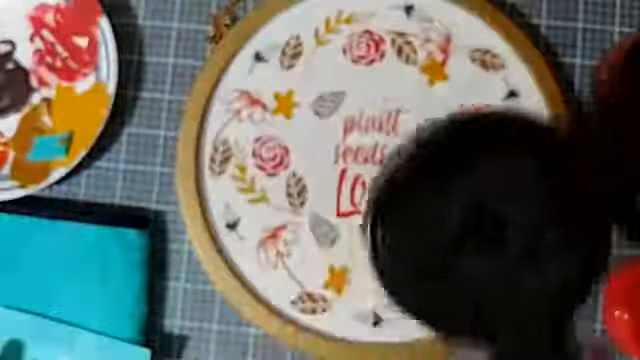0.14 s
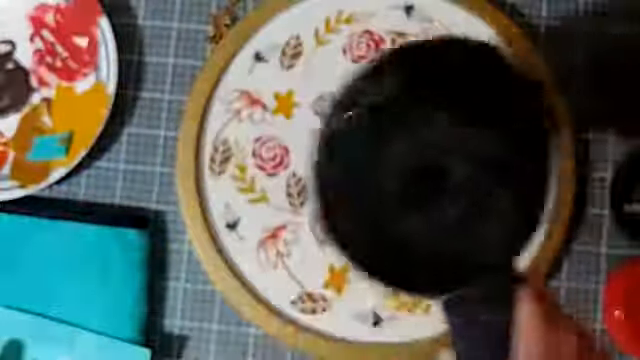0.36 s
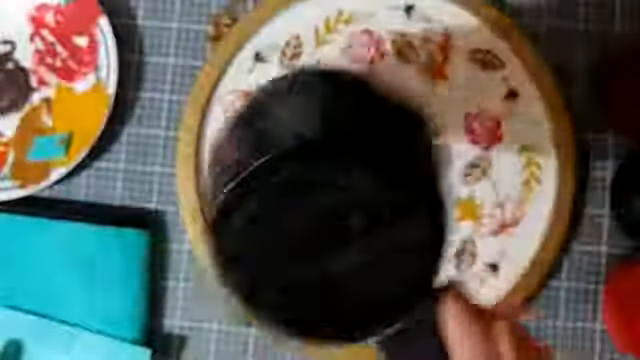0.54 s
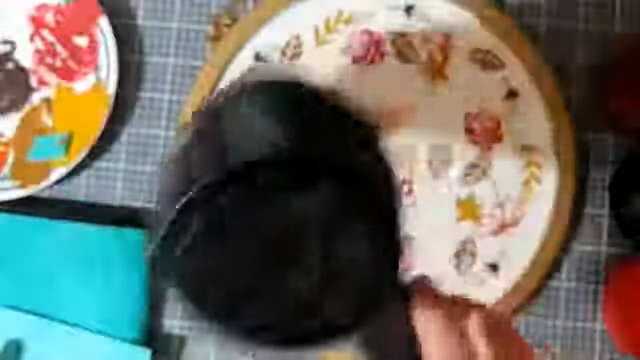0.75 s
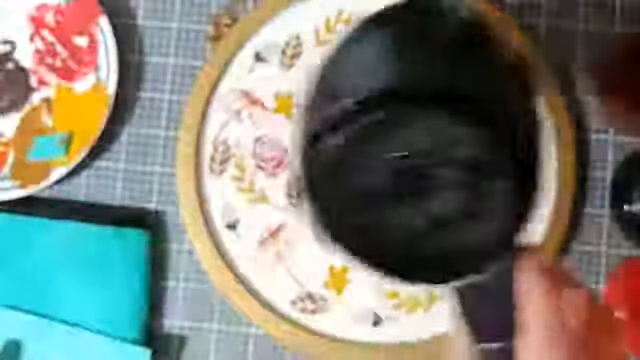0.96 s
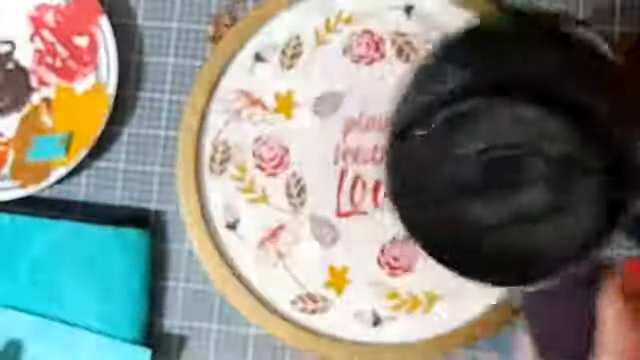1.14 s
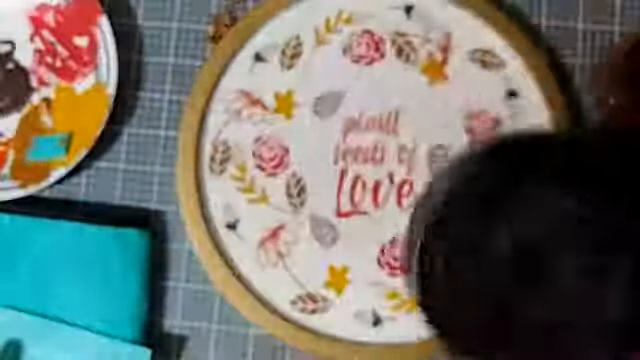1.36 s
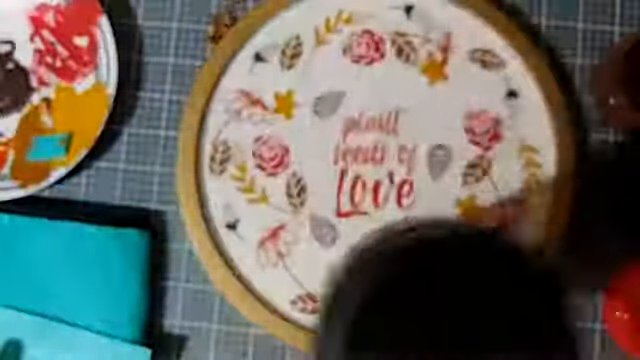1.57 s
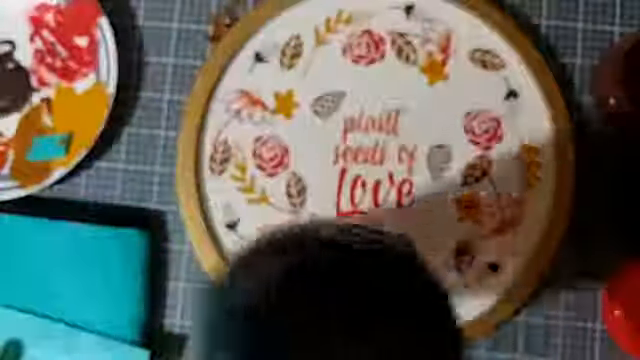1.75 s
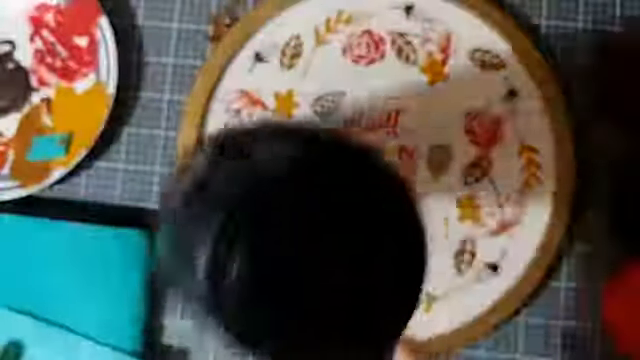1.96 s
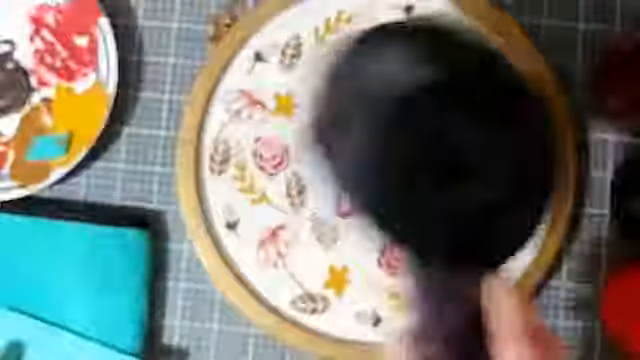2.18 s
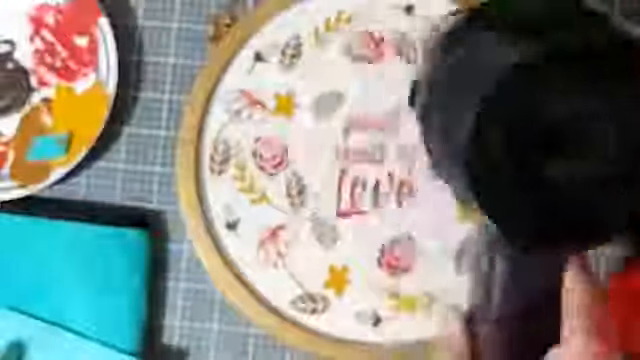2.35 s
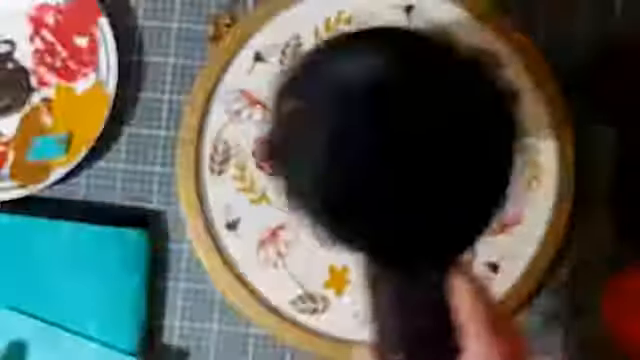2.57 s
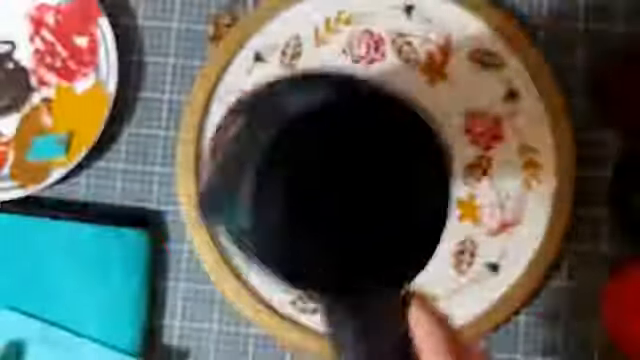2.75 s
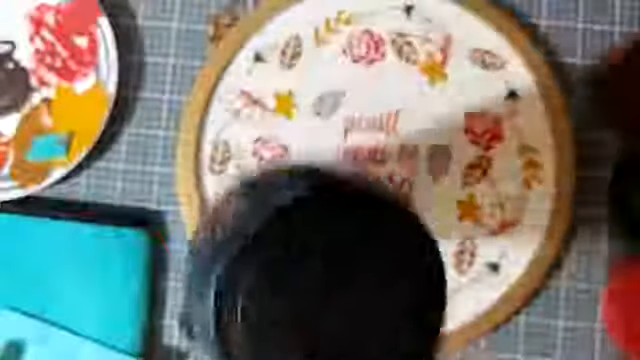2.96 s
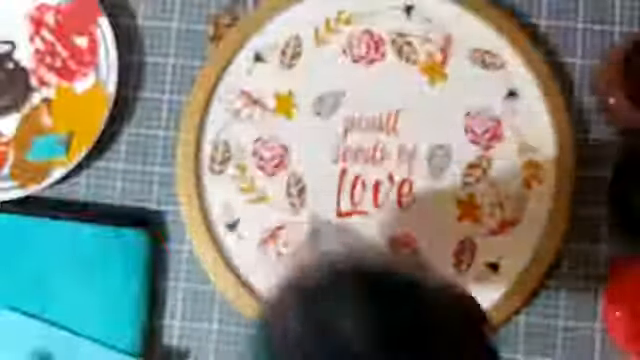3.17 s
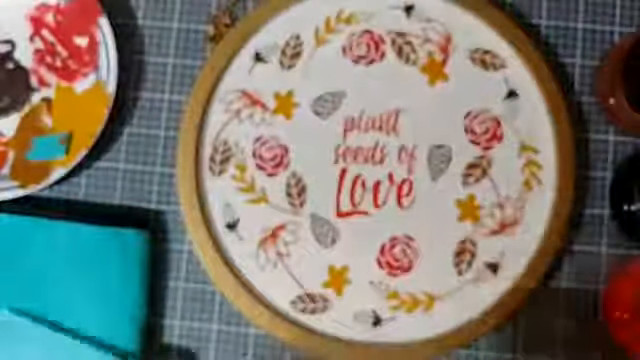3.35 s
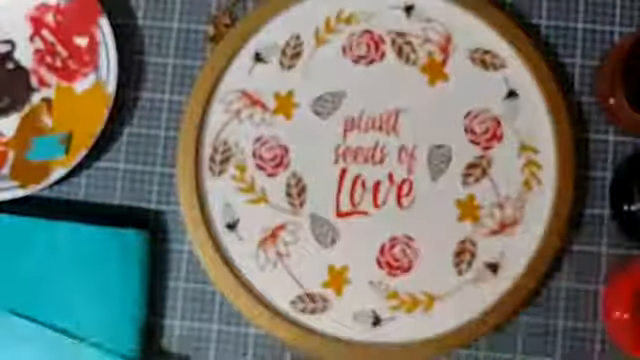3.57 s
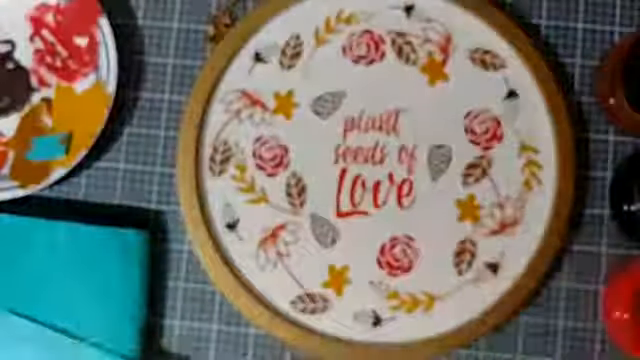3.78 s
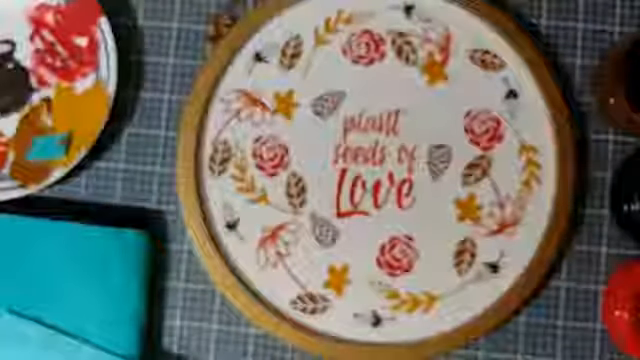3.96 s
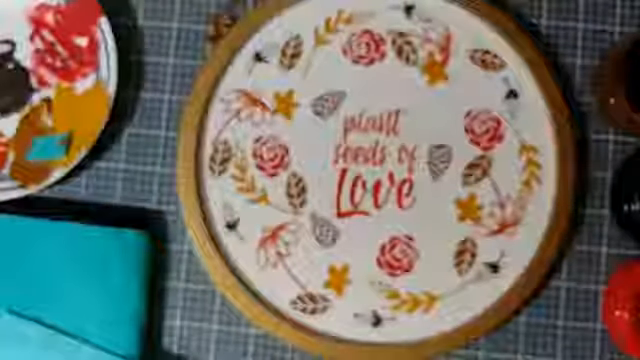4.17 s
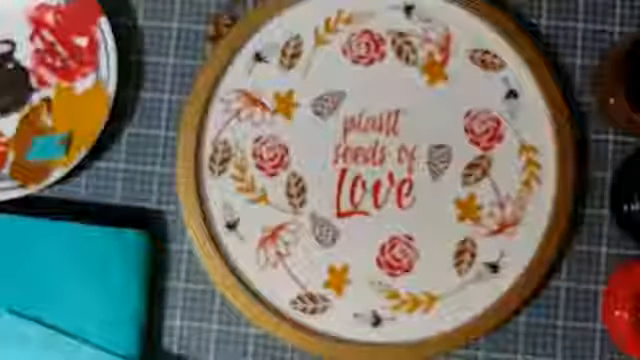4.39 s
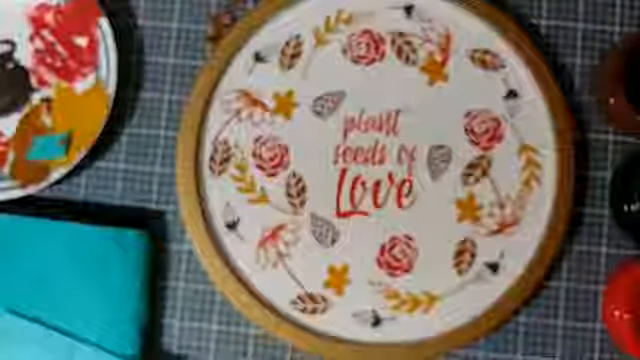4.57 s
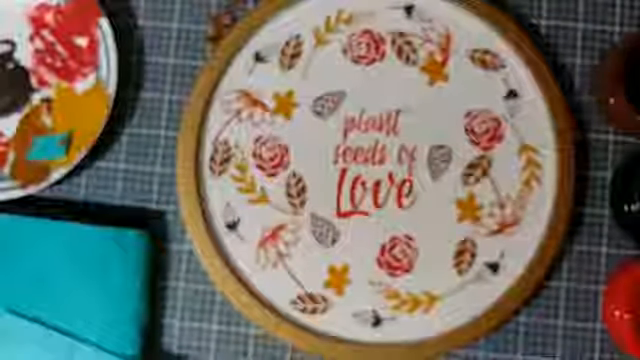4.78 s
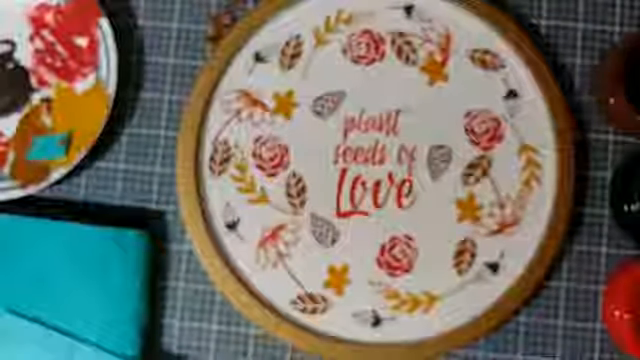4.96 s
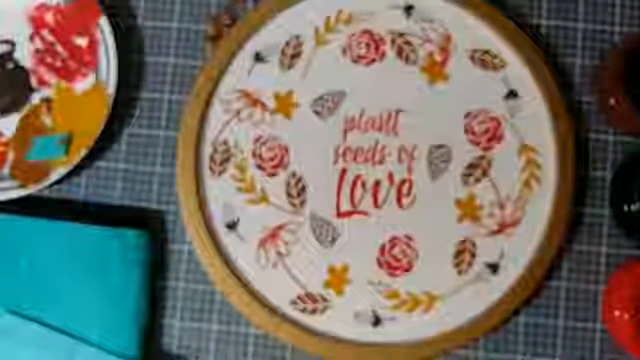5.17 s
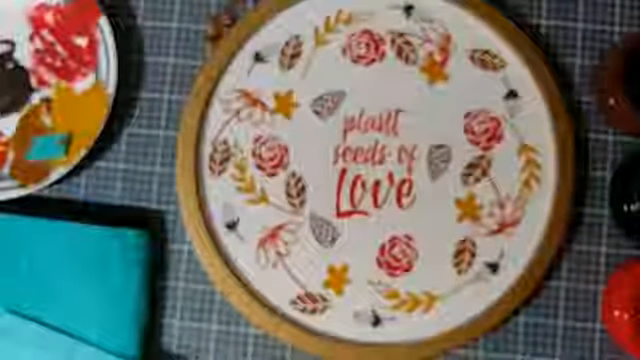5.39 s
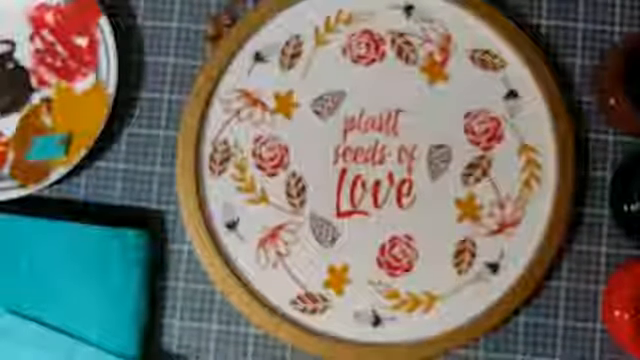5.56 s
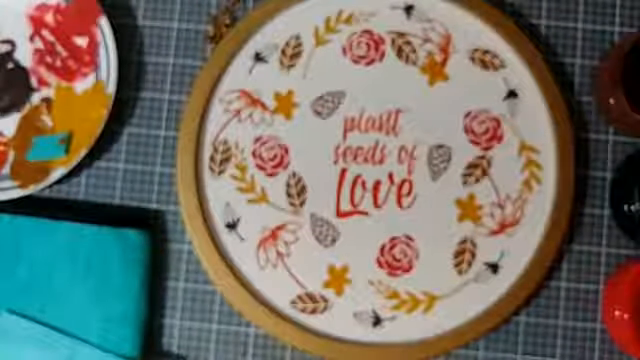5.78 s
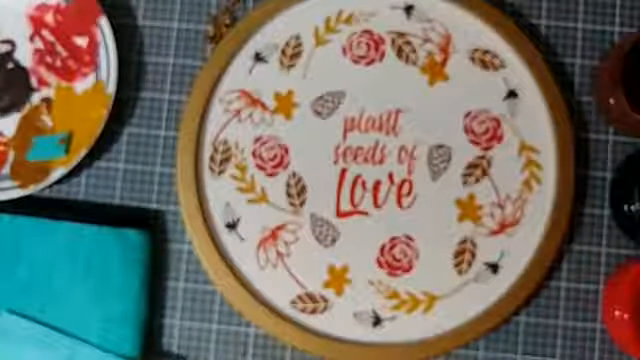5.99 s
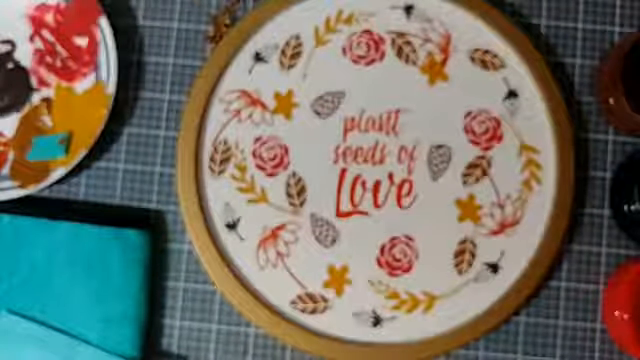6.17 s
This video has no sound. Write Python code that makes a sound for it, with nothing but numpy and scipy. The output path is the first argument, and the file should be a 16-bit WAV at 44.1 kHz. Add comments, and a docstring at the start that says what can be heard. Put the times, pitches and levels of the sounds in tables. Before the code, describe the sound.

Rushing dryer air and a faint motor whine sweep about, recede, cut off with a falling pitch, then hard plastic knocks boomily on a table.

```python
"""A hair dryer is waved over a wooden tray under a phone: a harmonic blade whine over turbulent air noise,
filtered by resonances that swell with the aim. It is carried away, switched off and runs down, then is
set on the table: noisy cracks, decaying casing and wood modes, and a low boom as it rocks to rest.
Soft bumps and short bursts of noise, one a thin hiss near 13 kHz, are scattered about. The table hums
softly all the while, as randomly driven resonances, in the filtered noise of a small quiet room."""
import sys
import numpy as np
from scipy import signal
from scipy.fft import rfft, irfft
from scipy.io import wavfile
from scipy.ndimage import uniform_filter1d

SR = 44100
rng = np.random.default_rng(int(sys.argv[2]) if len(sys.argv) > 2 else 0)


def inscribe(sig):
    """Save sig as 16-bit PCM at rate SR to the path in sys.argv[1].

    A 1-D sig is mono; a 2-D sig holds one channel per row.
    Samples are clipped to [-1, 1] before scaling.
    """
    pcm = np.round(np.clip(np.atleast_2d(sig).T, -1, 1) * 32767)
    wavfile.write(sys.argv[1], SR, pcm.astype(np.int16))


def level_to_linear(level):
    """Convert decibel levels to linear amplitude factors, elementwise."""
    exponent = np.asarray(level, float) / 20
    return 10 ** exponent


N = 274743
TIME = np.arange(N) / SR
SWITCH_OFF_S = 4.235
ECHO_T60_S = 0.19


def level(x, db):
    """Scale a signal to an rms level."""
    return x * level_to_linear(db) / np.sqrt(np.mean(x ** 2))


def curves(breakpoints):
    """Linear interpolation of every column against the first, the time in seconds."""
    s, *columns = np.transpose(breakpoints)
    return [np.interp(TIME, s, column) for column in columns]


def colour(x, points):
    """Minimum-phase filter through (Hz, dB) points: folding the cepstrum makes the response causal."""
    hz, db = np.transpose(points)
    grid = np.fft.rfftfreq(4096, 1 / SR) + 1  # 1 Hz up, so that the logarithm exists
    log_gain = np.interp(np.log(grid), np.log(hz), db) * np.log(10) / 20
    cepstrum = irfft(log_gain)
    cepstrum[1:2048] *= 2
    cepstrum[2049:] = 0
    response = irfft(np.exp(rfft(cepstrum)))
    return signal.fftconvolve(x, response)[:len(x)]


def band(x, hz, width):
    """Second-order resonance with unit gain at its centre."""
    return signal.lfilter(*signal.iirpeak(hz, hz / width, fs=SR), x)


def walk(rate):
    """Band-limited random modulation: levels held 1 / rate s, smoothed twice; spread near 1."""
    hold = int(SR / rate)
    steps = np.repeat(rng.standard_normal(N // hold + 1), hold)
    return 1.3 * uniform_filter1d(uniform_filter1d(steps, hold), hold)[:N]


def swell(s, length):
    """Gaussian rise and fall of height 1 around a moment, down to exp(-2) half a length away."""
    return np.exp(-8 * ((TIME - s) / length) ** 2)


def ring(modes, t, tilt_db=0):
    """Modal sum of decaying sines; the tilt per octave about 600 Hz says where the blow lands."""
    out = 0
    for hz, db, t60 in modes:
        mode_db = db + tilt_db * np.log2(hz / 600) - 60 * t / t60
        out = out + level_to_linear(mode_db) * np.sin(2 * np.pi * hz * t)
    return out


def add(out, s, x):
    """Superpose a sound on the mix from a given moment."""
    i = int(s * SR)
    out[i:i + len(x)] += x[:N - i]


def room():
    """Quiet air of the room: stationary noise of fixed spectrum with a slight slow waver."""
    # spectrum of the room air: frequency_hz, density_db (relative)
    spectrum = [(40, -14), (150, -9), (300, -22), (700, -14), (1500, -20), (2400, -27), (3500, -27.5),
                (4800, -24.5), (9000, -33.5), (13000, -29)]
    return level(colour(rng.standard_normal(N), spectrum), -60.5) * level_to_linear(0.5 * walk(3.0))


def table(force):
    """Modal resonance: a force drives the low modes of the table top."""
    # modes of the top: frequency_hz, width_hz, level_db (relative)
    modes = [(57, 7.5, -21), (87.2, 20.3, -4), (123.1, 5.6, 5.5), (175, 17.7, -8.5), (237.6, 9.1, -15),
             (482, 74, -17)]
    return sum(level_to_linear(db) * band(force, hz, width) for hz, width, db in modes)


def bumps():
    """Soft bumps on the table: low tones in Gaussian envelopes."""
    # bumps: centre_s, peak_db, length_s (from the peak to exp(-2)), pitch_hz
    bump_list = [(0.493, -41, 0.0086, 90), (1.138, -47.5, 0.12, 85.5), (2.148, -35, .03, 117),
                 (3.7, -41, 0.011, 91), (3.95, -50.5, 0.1, 185), (4.093, -41, 0.015, 116),
                 (5.418, -35, 0.011, 124), (5.507, -42, 0.034, 121), (5.849, -44, 0.023, 88),
                 (5.896, -44, 0.033, 129), (5.929, -31, 0.0041, 128)]
    out = np.zeros(N)
    for s, db, length, hz in bump_list:
        t = np.arange(int(4 * length * SR)) / SR - 2 * length
        envelope = level_to_linear(db) * np.exp(-2 * (t / length) ** 2)
        add(out, s - 2 * length, envelope * np.cos(2 * np.pi * hz * t))
    return out


def hum():
    """Forced vibration: a steady random shake excites the table modes, wavering and lulling once."""
    hum_db, waver_db = -53, 2.0
    lull_s, lull_length_s, lull_db = 5.77, 0.11, -5.5
    shake_db = hum_db + waver_db * walk(5.01) + lull_db * swell(lull_s, lull_length_s)
    shaken = level(table(rng.standard_normal(N)), 0)
    return shaken * level_to_linear(shake_db + 1.87 * walk(20))


def noise_bursts():
    """Short bursts of resonance-filtered noise, each with its own exponential decay."""
    # bursts, one a thin hiss near 13 kHz: start_s, level_db (before the decay), centre_hz, width_hz, t60_s
    burst_list = [(4.39, -51, 5800, 5000, 0.072), (4.678, -53, 6470, 2520, 0.18),
                  (4.768, -57, 6900, 9000, .05), (4.962, -61, 6500, 6000, 0.052),
                  (5.0, -60.5, 2470, 1490, .08), (5.706, -58.5, 6300, 3000, 0.26),
                  (5.724, -46, 13300, 2500, 0.28), (6.202, -58, 9000, 9000, 0.037)]
    out, t = np.zeros(N), np.arange(SR // 3) / SR
    noises = rng.standard_normal((len(burst_list), len(t)))
    for (s, db, hz, width, t60), noise in zip(burst_list, noises):
        burst = level(band(band(noise, hz, width), hz, width), db)
        add(out, s, burst * level_to_linear(-60 * t / t60))
    return out


def booms():
    """Low boom of the table top near 127 Hz after the blows: a single tone swells, holds and is damped."""
    # booms: start_s, level_db, hold_s, t60_s
    boom_list = [(5.16, -12.5, 0.0064, 0.14), (5.2616, -14, 0.0065, 0.1), (5.2993, -16, 0.061, 0.047),
                 (5.424, -40, .004, .12)]
    boom_hz, swell_s = 127, 0.012
    out, t = np.zeros(N), np.arange(SR // 2) / SR
    for s, db, hold, t60 in boom_list:
        rise = np.clip(0.25 + 0.7 * t / swell_s, 0, 1) * np.clip(t / 0.0076, 0, 1)
        fall = level_to_linear(-60 * np.maximum(t - swell_s - hold, 0) / t60)
        add(out, s, level_to_linear(db) * rise * fall * np.sin(2 * np.pi * boom_hz * t - 0.6))
    return out


def blows():
    """Impact excitation as dryer meets table: a noisy crack and echo, casing modes and wood modes."""
    # blows: start_s, crack_db, casing_db (over the crack), wood_db, wood_tilt_db (per octave)
    blow_list = [(5.16, -16.5, 3.5, -13.5, 1.5), (5.258, -14, -18.5, -23.5, -2.5),
                 (5.2983, -21, -7.5, -15.5, 0.5), (5.3205, -24, -26, -24.5, -3),
                 (5.428, -59, -3, -27.5, 11)]
    # modes of the dryer casing: frequency_hz, level_db (relative), t60_s
    casing = [(2290, -6, 0.034), (3320, -18, 0.047), (3760, -1, 0.0138), (4270, 1.5, 0.01)]
    # modes of the wood: frequency_hz, level_db (relative), t60_s
    wood_modes = [(29, -10, 0.11), (98, -19, 0.1), (206, 3, 0.11), (255, -1.5, 0.11), (307, 3, 0.045),
                  (385, -0.5, 0.072), (411, -3, 0.13), (504, 2, 0.076), (599, -4.5, 0.068),
                  (716, -10, 0.051), (866, -14, 0.1), (1010, -4, 0.025), (1470, -33, 0.046)]
    # spectrum of the crack: frequency_hz, density_db (relative)
    shell = [(400, -2), (1400, -6), (2200, 3), (3800, 2), (6000, 10.5), (9000, -3), (14000, -7)]
    echo_db = -12.5
    out, t = np.zeros(N), np.arange(SR // 2) / SR
    noises = rng.standard_normal((len(blow_list), len(t)))
    for (s, crack_db, casing_db, wood_db, tilt_db), noise in zip(blow_list, noises):
        # the echoes build up over some milliseconds after the crack
        echo = level_to_linear(echo_db - 60 * t / ECHO_T60_S) * np.clip(t / 0.0067, 0, 1)
        crack = colour(noise * (np.exp(-(t / 0.002) ** 2) + echo), shell)
        crack = crack + level_to_linear(casing_db) * ring(casing, t)
        # a decaying noise beside the wood modes
        scatter_points = [(150, -7.5 - 2 * tilt_db), (400, -tilt_db / 2),
                          (1200, -15.0 + tilt_db), (3000, -45.0 + tilt_db)]
        scatter = colour(noise[::-1], scatter_points) * level_to_linear(8.0 - 60 * t / 0.17)
        wood = (ring(wood_modes, t, tilt_db) / 2 + scatter) * np.clip(t / 0.0012, 0, 1)
        add(out, s, level_to_linear(crack_db) * crack + level_to_linear(wood_db) * wood)
    return out


def walls(x):
    """Diffuse reverberation: decaying scattered echoes, new at each place the dryer passes."""
    walls_db, change_s = -7.5, 0.347  # echo energy over the direct sound; time between patterns
    t, wet, step = np.arange(SR // 3) / SR, np.zeros(N), int(change_s * SR)
    ramp = np.sin(np.pi * np.arange(2 * step) / (2 * step))  # overlapping pieces keep the power constant
    padded = np.r_[np.zeros(step), x]
    for k in range(int(SWITCH_OFF_S * SR) // step + 3):
        decay = rng.standard_normal(len(t)) * level_to_linear(-60 * t / ECHO_T60_S)
        echo = level(decay, walls_db) / np.sqrt(len(t))
        piece = padded[k * step:(k + 2) * step] * ramp
        add(wet, k * step / SR, signal.fftconvolve(piece, echo))
    wet = np.r_[wet[step:], np.zeros(step)]  # undo the padding
    return (x + wet) / np.sqrt(1 + level_to_linear(2 * walls_db))


def air():
    """Turbulent jet noise, fluttering in patches, blows each cavity resonance harder as it turns to it."""
    # stream as the dryer circles and is then carried away: time_s, hiss_db
    stream = [(0, -39), (1.3, -39), (1.6, -38.5), (2.09, -40.5), (2.41, -38.5), (2.8, -40.5), (3.25, -38.5),
              (3.47, -40.5), (3.58, -42.5), (4.22, -44)]
    # spectrum of the hiss: frequency_hz, density_db (relative)
    spectrum = [(150, -16.5), (400, -17.5), (900, -10), (1400, -8), (2400, -10.5), (3500, -12), (4800, -4),
                (6000, -4.5), (9000, -13), (14000, -9.5)]
    # cavities by name: centre_hz, width_hz, rest_db (over the hiss)
    cavities = {"barrel": (687, 224, -16), "tray": (965, 130, -14.5), "grille": (1222, 380, -12.5),
                "nozzle": (1726, 150, -20.5), "gap": (2030, 440, -17.5), "splash": (3236, 800, -11.5),
                "rim": (4150, 1200, -16.5)}
    # the jet turns toward a cavity and away again: cavity, centre_s, length_s, peak_db (over the hiss)
    swells = [("barrel", 0.16, 0.99, -9.5), ("barrel", 0.845, 0.23, -11), ("barrel", 1.205, 0.57, -9.5),
              ("barrel", 2.24, 1, -14.5), ("barrel", 3.25, 0.2, -18), ("tray", 0.31, 0.15, -9),
              ("tray", 1.8, 0.12, -13.5), ("tray", 1.7, .12, -7), ("tray", 3.534, 0.33, -2.2),
              ("tray", 3.8, 0.22, -8.5), ("tray", 4.3, 0.6, -6), ("grille", 0.093, 0.25, -13),
              ("grille", 2.2, 0.22, -9), ("grille", 2.74, 0.54, -12), ("grille", 3.5, 0.15, -13),
              ("grille", 3.8, 0.55, -4.5), ("nozzle", 0.327, 0.092, -9), ("nozzle", 0.59, 0.23, -8.5),
              ("nozzle", 0.93, 0.18, -4.5), ("nozzle", 1.063, 0.11, -2.2), ("nozzle", 1.207, 0.31, 0),
              ("nozzle", 1.9, 0.23, -11), ("nozzle", 3.1, .15, -15), ("nozzle", 2.5, 0.38, -10.5),
              ("nozzle", 3.16, 0.31, -10), ("nozzle", 3.33, 0.25, 0.92), ("nozzle", 3.46, .2, 5.7),
              ("gap", 0.73, 0.79, -9), ("gap", 1.96, 0.81, -8.5), ("gap", 2.92, 0.68, -4.5),
              ("splash", 0.763, 0.18, -11), ("splash", 1.19, 0.043, -3), ("splash", 1.38, 0.42, -9),
              ("splash", 2.04, 0.29, -13.5), ("splash", 2.37, 0.18, -15), ("splash", 3.52, 0.24, -6),
              ("rim", 0.076, 0.32, -12), ("rim", 0.4, 0.44, -8.5), ("rim", 1.38, 0.68, -5),
              ("rim", 2.44, 0.49, -4)]
    dies_db_per_s = -86
    hiss_db = curves(stream)[0] + dies_db_per_s * np.maximum(TIME - SWITCH_OFF_S, 0)
    hiss = colour(rng.standard_normal(N), spectrum)
    # eddies: each half octave flutters on its own
    centres = 200 * 2 ** np.arange(0, 6.5, 0.5)
    out = level(sum(level_to_linear(1.2 * walk(25)) * band(hiss, hz, hz / 3) for hz in centres), 0)
    for name, (hz, width, rest_db) in cavities.items():
        # two resonances in a row, each widened
        blown = band(band(rng.standard_normal(N), hz, 1.28 * width), hz, 1.28 * width)
        aim = level_to_linear(rest_db)
        for cavity, s, length, db in swells:
            if cavity == name:
                aim = aim + level_to_linear(db) * swell(s, length)
        out = out + level(blown, 0) * aim * level_to_linear(1.93 * walk(30.01))
    return walls(out * level_to_linear(hiss_db))


def whine():
    """Blade-passing tone and wavering overtones; after switch-off the speed decays exponentially."""
    # fan while powered, bent a little by its motion: time_s, blade_rate_hz, whine_db
    powered = [(0.0, 1070, -49), (0.46, 1066, -50.5), (1.17, 1068, -44.5), (1.18, 1070, -54),
               (1.88, 1060, -51.5), (2.26, 1065, -36), (2.41, 1067, -55.5), (2.43, 1065, -47),
               (2.6, 1065, -51), (2.64, 1064, -41.5), (2.7, 1064, -47), (3.24, 1067, -50.5),
               (3.44, 1059, -54), (3.52, 1058, -45.5), (3.98, 1070, -50.5), (4.2, 1068, -48.5)]
    # overtones, the shaft (a sixth of the blade rate) then multiples 2 to 6: level_db (over the whine)
    overtones = [-23.5, -15.5, -18, -11, -17, -37]
    rundown_s = 0.33  # time constant of the speed
    rundown_db, rundown_db_per_s, flutter_db = -47, -150, 5
    hz, powered_db = curves(powered)
    off = np.maximum(TIME - SWITCH_OFF_S, 0)
    blade_hz = hz * np.exp(-off / rundown_s) * (1 + 0.0012 * walk(39.6))
    phase = 2 * np.pi * np.cumsum(blade_hz) / SR
    tone = level_to_linear(2.0 * walk(18)) * np.sin(phase)
    for multiple, db in zip([1 / 6, 2, 3, 4, 5, 6], overtones):
        tone += level_to_linear(db + 3.2 * walk(6.33)) * np.sin(multiple * phase)
    off_db = rundown_db + rundown_db_per_s * off + flutter_db * walk(40)
    whine_db = np.where(off > 0, off_db, powered_db)
    return np.sqrt(2) * level_to_linear(whine_db) * tone  # a sine's peak is sqrt(2) times its rms


def scene():
    """Linear superposition of all sources at the phone."""
    return (room() + noise_bursts() + hum() + bumps() + booms() + blows() + air() + whine())[None]


def top_cut(x):
    """Nothing passes above the cut-off."""
    return signal.sosfilt(signal.butter(12, 14760, fs=SR, output="sos"), x)


def record(dry):
    """Resonant response: the microphone port rings near 6 kHz; a steep low-pass cuts the top."""
    # microphone response: frequency_hz, gain_db
    response = [(30, -5.5), (70, 0), (1800, 0), (2400, -2.5), (3200, 1), (4900, -4), (6000, 9), (6700, 2),
                (7800, -6.5), (13300, -12.5), (14100, -22.5)]
    top_hz = 14350
    mix = colour(dry[0], response)[None]
    low_pass = signal.ellip(10, 0.3, 60, top_hz, fs=SR, output="sos")
    mix = signal.sosfilt(low_pass, mix)
    return top_cut(mix)


dry = scene()
out = record(dry)
inscribe(out)
```